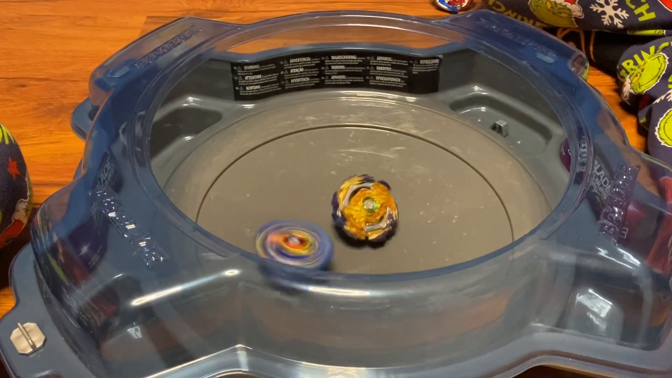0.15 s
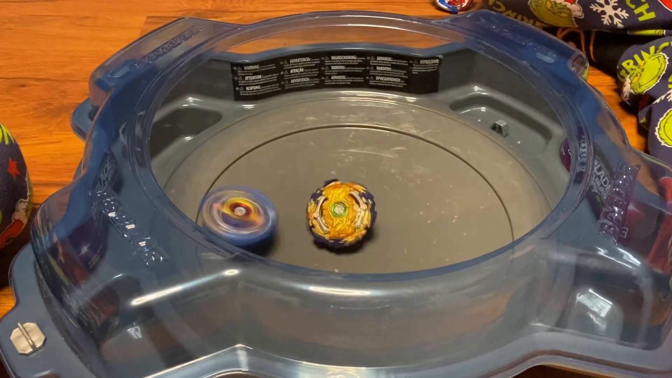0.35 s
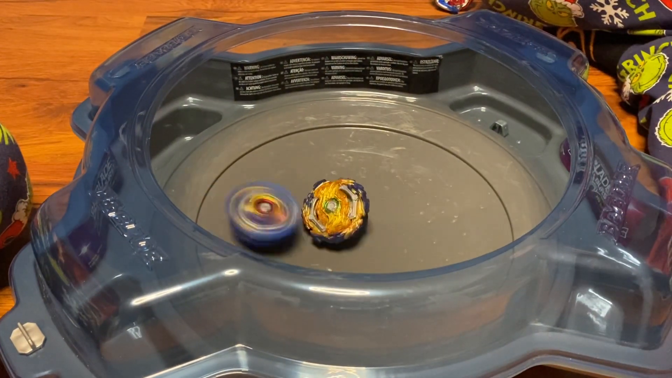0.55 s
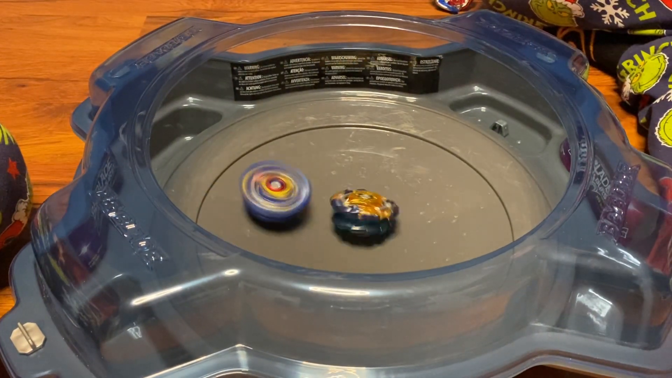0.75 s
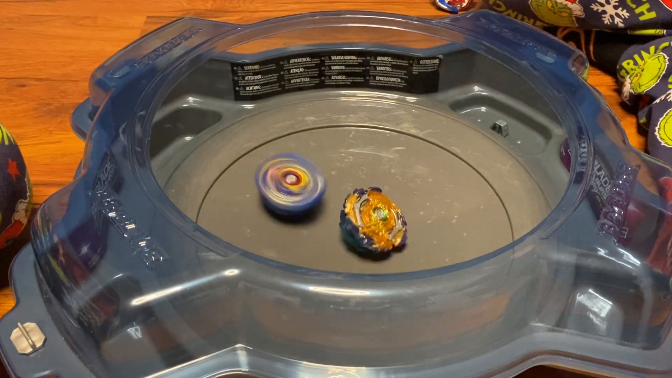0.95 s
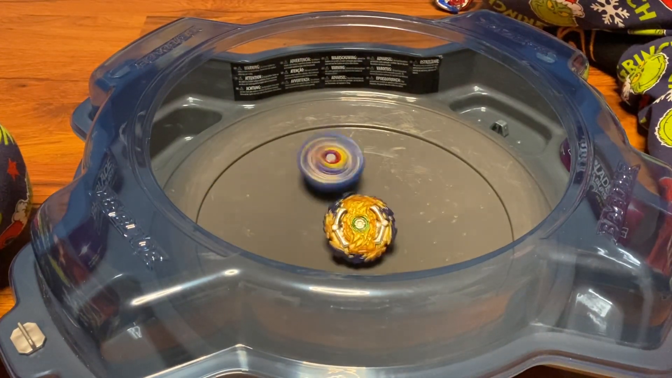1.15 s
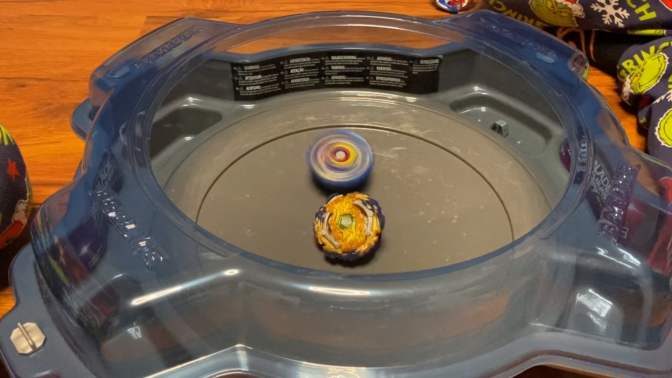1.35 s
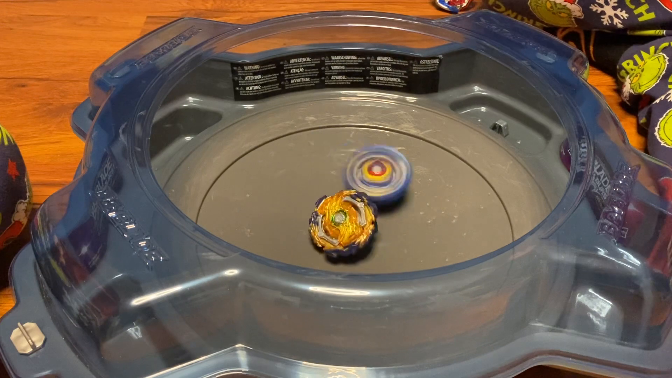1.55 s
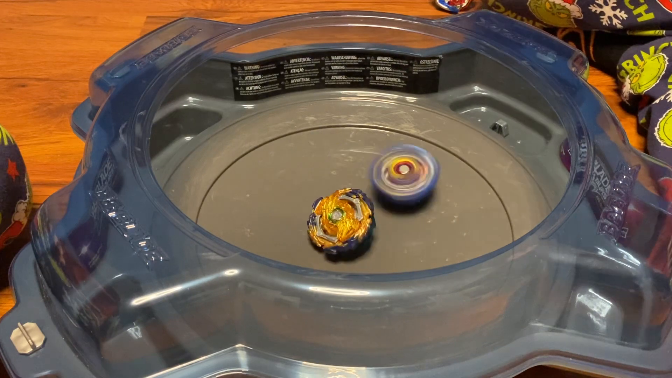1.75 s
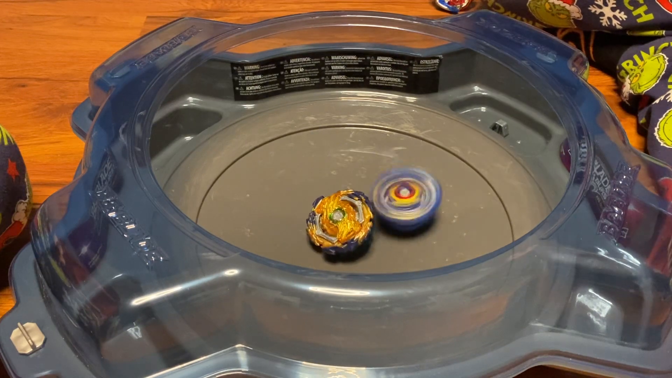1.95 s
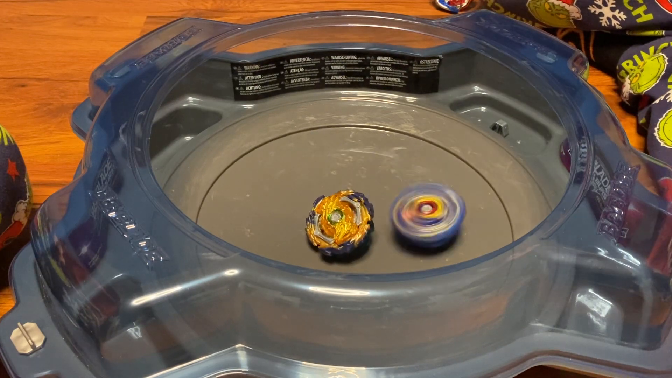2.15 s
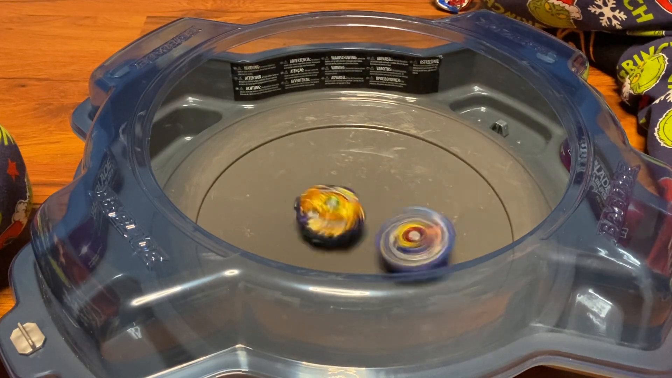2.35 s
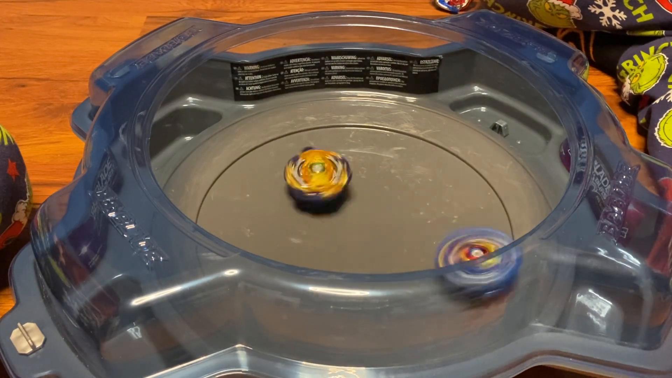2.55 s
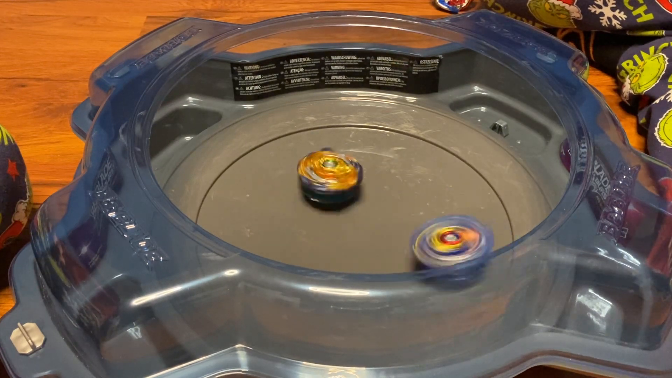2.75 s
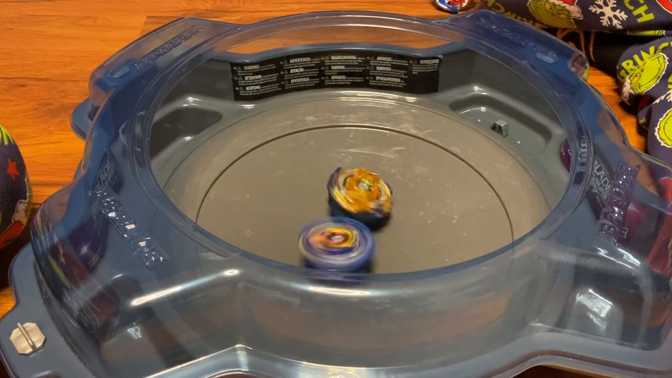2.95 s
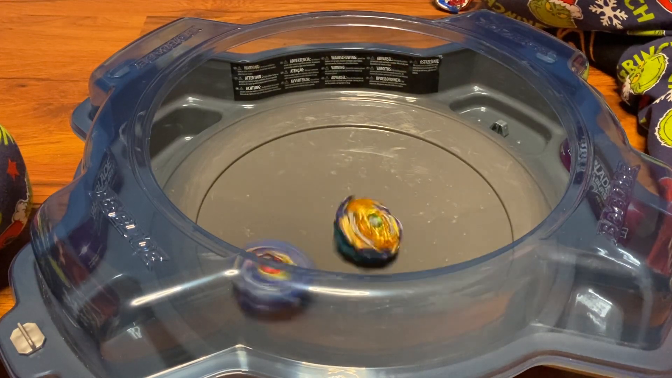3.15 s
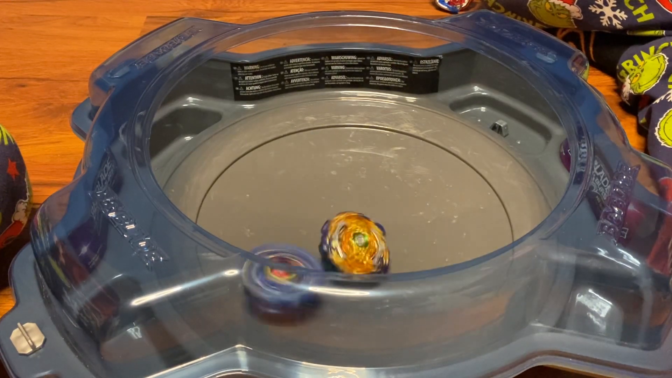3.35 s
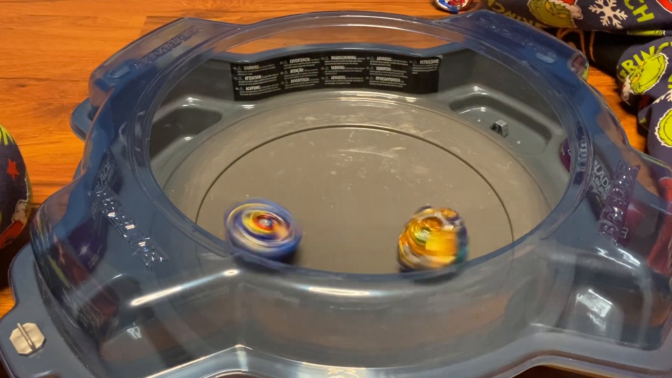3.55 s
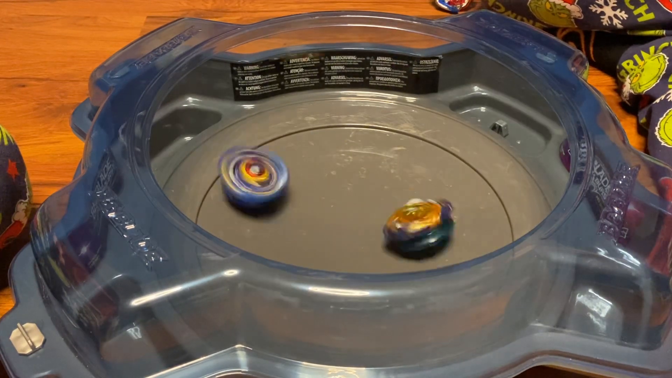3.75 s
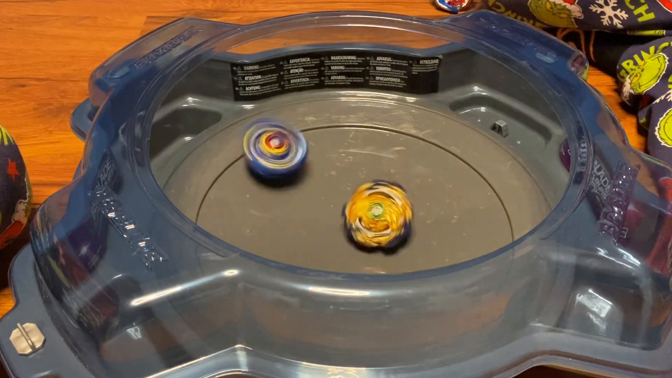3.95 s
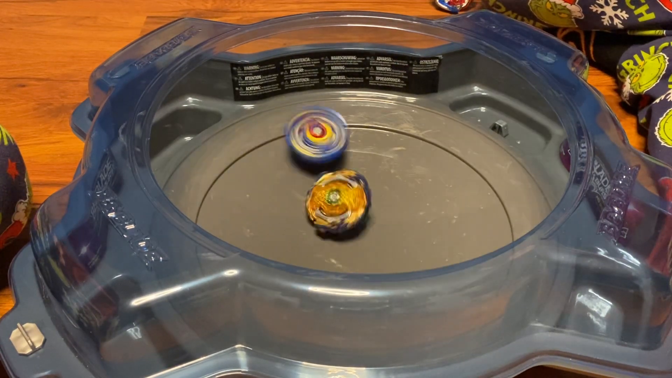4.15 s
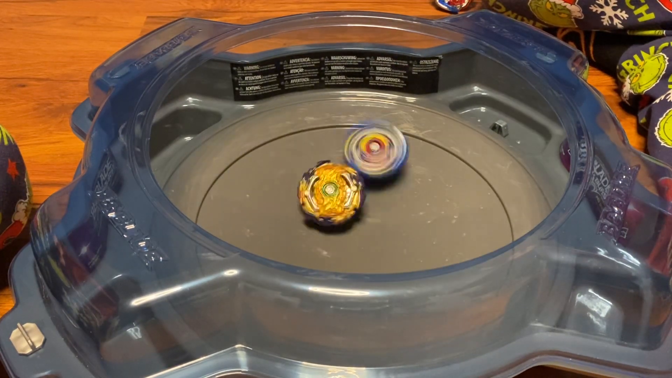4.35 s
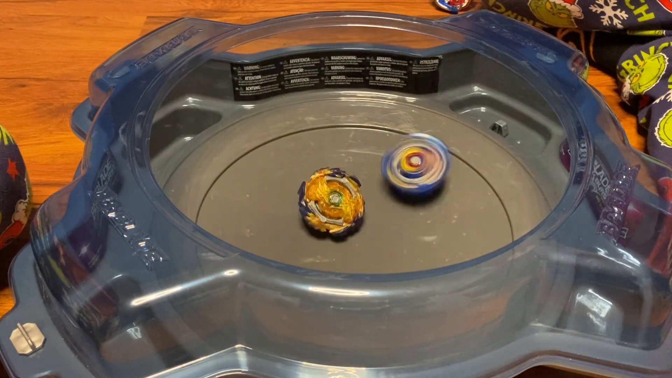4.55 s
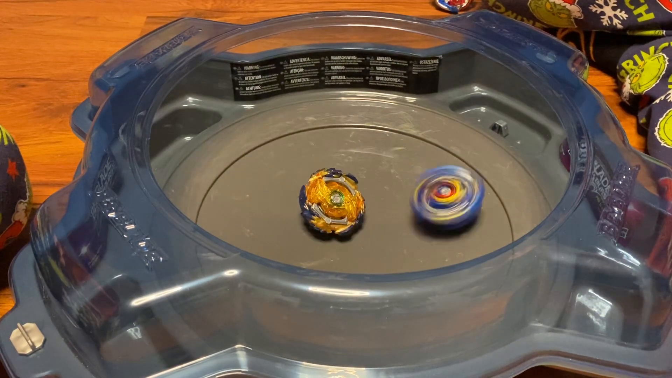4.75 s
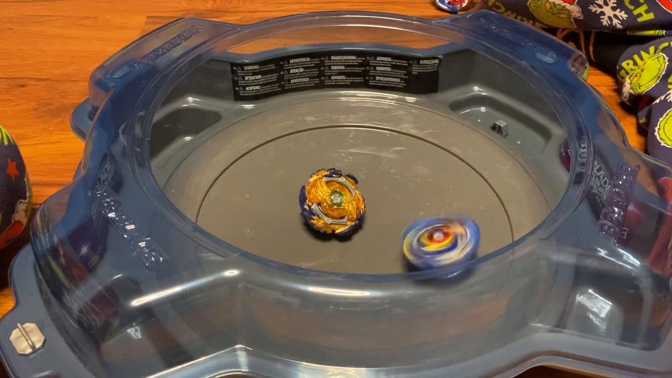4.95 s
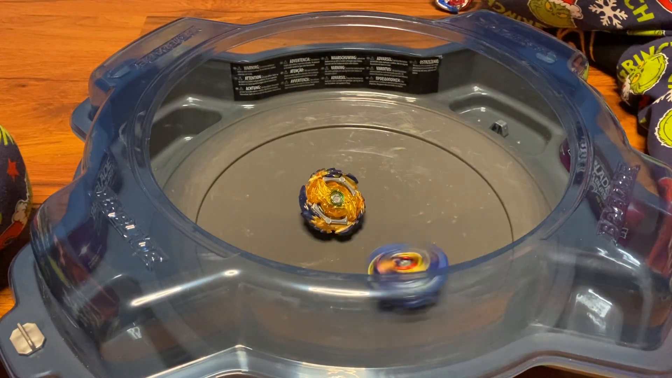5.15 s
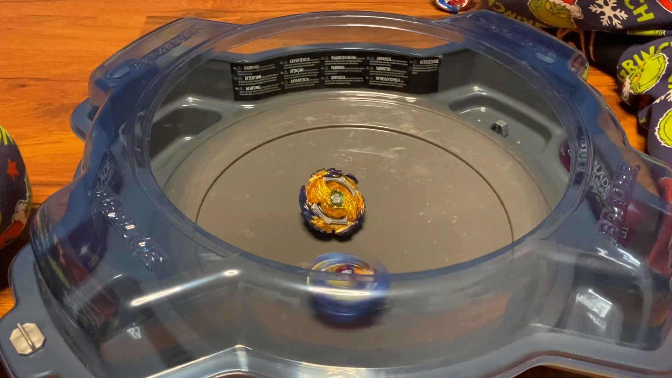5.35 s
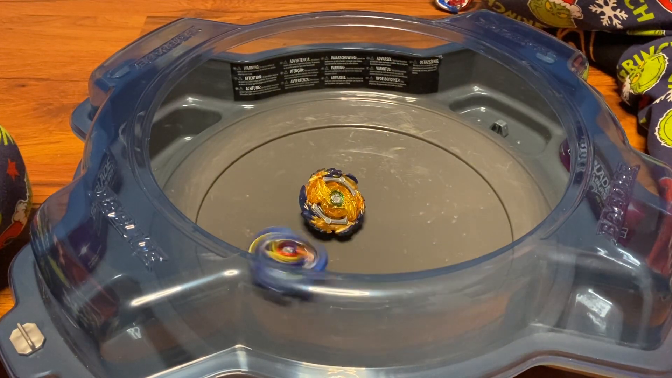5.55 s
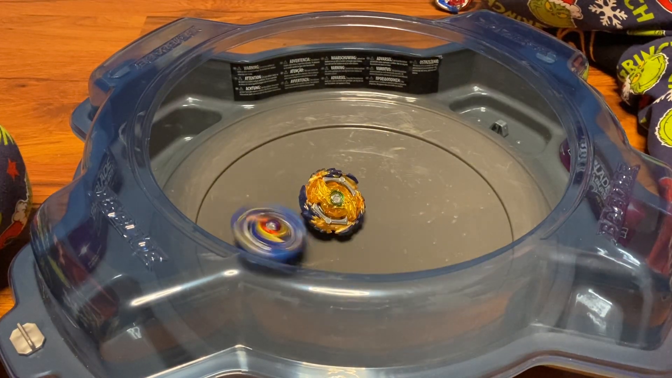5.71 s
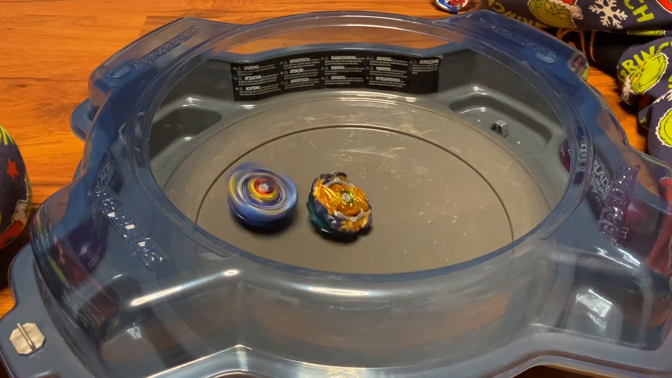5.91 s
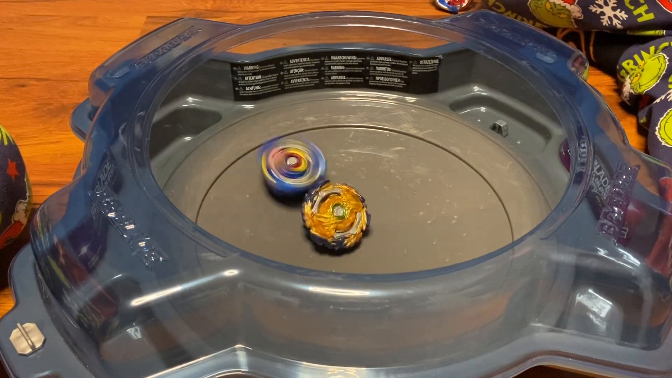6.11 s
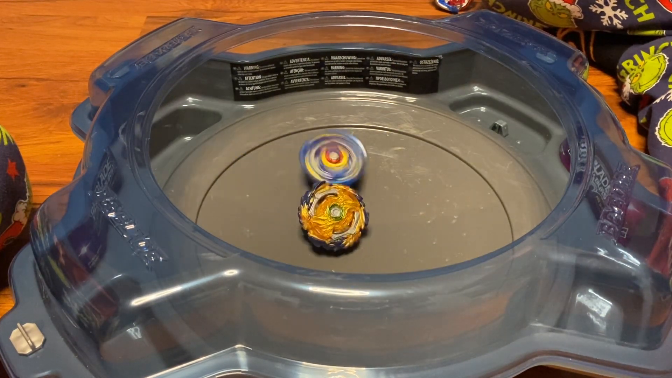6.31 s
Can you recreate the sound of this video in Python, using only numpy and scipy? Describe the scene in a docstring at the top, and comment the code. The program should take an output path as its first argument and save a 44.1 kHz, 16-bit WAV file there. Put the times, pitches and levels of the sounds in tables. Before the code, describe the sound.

Close up in a small room, two spinning tops rumble and scrape in a thin plastic bowl. Sharp clacks crack out between gritty, rhythmic scrapes and tiny metallic chinks. Around three seconds the scraping turns into a dense clatter of rapid knocks with one very hard hit. A few more clacks follow, then the scraping fades, leaving low humming, faint brushing ticks and late dull knocks.

```python
"""Two spinning tops in an arena

Two toy tops with metal rims spin in a thin plastic arena, close to a phone in a small room.
Noise grains shaped by the shell make the rumble and scraping; sine waves make the spinning hum.
Clacks, knocks and scrapes are short noise bursts, most with ringing plastic or metal.
From three seconds on, bouts of chatter rasp between the blows; the scraping has faded by the end."""
import sys
import numpy as np
from scipy import signal
from scipy.fft import rfft, irfft, next_fast_len
from scipy.io import wavfile

SR = 44100
rng = np.random.default_rng(int(sys.argv[2]) if len(sys.argv) > 2 else 0)


def wav_out(sig):
    """Save sig, one row per channel (or a flat mono array), as 16-bit PCM at SR to the path in sys.argv[1]."""
    wavfile.write(sys.argv[1], SR, np.round(np.clip(np.atleast_2d(sig).T, -1, 1) * 32767).astype(np.int16))


N = 285665
TIME = np.arange(N) / SR  # seconds


def undb(db):
    """Decibels to gain."""
    return 10 ** (np.asarray(db) / 20)


def unit(x):
    """Scale to rms 1."""
    return x / np.sqrt(np.mean(x ** 2))


def curves(table):
    """Each column of a timed table, joined by straight lines."""
    s, *columns = np.transpose(table)
    return [np.interp(TIME, s, c) for c in columns]


def add(out, s, x):
    """Mix x into out from time s on."""
    i = max(int(s * SR), 0)
    out[i:i + len(x)] += x[:max(N - i, 0)]


def colour(x, points, peak_hz=1000, peak_db=0, octaves=.25, size=8192):
    """Causal filter through (Hz, dB) points with one optional resonance; white noise keeps its power."""
    pitch = np.log2(np.maximum(np.fft.rfftfreq(size, 1 / SR), 1))
    hz, db = np.transpose(points)
    resonance_db = peak_db / (1 + ((pitch - np.log2(peak_hz)) / octaves) ** 2)
    db = np.interp(pitch, np.log2(hz), db) + resonance_db
    # folding the cepstrum gives minimum phase: nothing sounds before its cause
    cepstrum = irfft(np.log(unit(undb(db))))
    cepstrum[1:size // 2] *= 2
    cepstrum[size // 2 + 1:] = 0
    response = irfft(np.exp(rfft(cepstrum)))
    return signal.fftconvolve(x, response)[:len(x)]


def walk(rate):
    """Random wander with a spread near 1: straight lines between `rate` random points a second."""
    knots = rng.standard_normal(int(N / SR * rate) + 2)
    return np.interp(TIME * rate, np.arange(len(knots)), knots) * np.sqrt(1.5)


def fade(t, t60):
    """A decay of 60 dB in t60 seconds."""
    return np.exp(-np.log(1000) * t / t60)


def ring(modes, t, scatter_db, detune=0.0051):
    """Struck modes; each blow lands elsewhere, weights them anew and detunes them slightly."""
    hz, db, t60 = np.transpose(modes)[:, :, None]
    gain = undb(db + scatter_db * rng.standard_normal(db.shape))
    hz = hz * (1 + detune * rng.standard_normal(hz.shape))
    waves = np.sin(2 * np.pi * (hz * t + rng.random(hz.shape)))
    return (gain * fade(t, t60) * waves).sum(0) / np.sqrt(np.sum(undb(db) ** 2) / 2)


def burst(t, rise, hold, t60):
    """Teeth grind past each other for a moment, then the plastic rings out: noise that rises and dies."""
    noise = rng.standard_normal(len(t))
    return noise * np.minimum(t / rise, 1) * fade(np.maximum(t - hold, 0), t60)


def grit(rate, spread_db):
    """Tiny collisions with the grain of the floor, `rate` a second, a few much harder than the rest."""
    size = undb(spread_db * np.minimum(rng.exponential(size=N), 5))
    hits = rng.random(N) < rate / SR
    return unit(hits * rng.standard_normal(N) * size)


# Quiet of the room. Each row: pitch in Hz, strength in relative dB.
ROOM_TONE = [(25, 2), (100, -1), (300, -11.5), (800, -23.5), (2000, -24.5), (5000, -22.5), (8000, -44),
             (12000, -59.5), (16000, -64)]


def room_air():
    """Faint steady noise, independent on the left and right."""
    sides = [colour(rng.standard_normal(N), ROOM_TONE) for _ in range(2)]
    return undb(-64.5) * np.array(sides)


# The fast top's speed. Each row: time in seconds, turns a second in Hz.
SPIN = [(0, 75.65), (1.6, 69.65), (4.8, 64.38), (6.48, 57.74)]


def fast_top_turn():
    """Turning angle of the fast top in radians, summed up from its speed."""
    return 2 * np.pi * np.cumsum(curves(SPIN)[0]) / SR


# Tips on the floor. Each row: time in seconds, rolling in dB, shell rumble in dB, both before trims.
CONTACT = [(0, -45.5, -40.5), (.15, -55.5, -52), (.55, -56, -58.5), (.75, -51, -47), (1.1, -56, -50.5),
           (2.3, -53.5, -58.5), (2.6, -49.5, -45.5), (2.8, -58, -50), (4.25, -54, -51), (4.7, -69, -57.5),
           (5.1, -69.5, -47), (5.55, -73.5, -63), (6.48, -63, -48.5)]
# A bout of chatter starts this much softer, builds up over this time constant, holds and dies away.
BUILD_DB, BUILD_S, SETTLE_T60_S = 4, 0.036, 0.32
# Rumble after a clack, relative to the thud column of CLACKS, and its decay.
JOLT_DB, JOLT_T60_S = -15.5, 0.77


def bout(t, start, end):
    """Strength of a bout of chatter: it builds up, holds and dies away."""
    build = undb(-BUILD_DB * np.exp(-np.maximum(t - start, 0) / BUILD_S))
    return (t >= start) * build * fade(np.maximum(t - end, 0), SETTLE_T60_S)


def load():
    """How hard the tips drum and shake the shell: steady contact, bouts of chatter and clack jolts."""
    roll, shake = undb(curves(CONTACT))
    # np.hypot adds the layers by power
    for start, end, _, drum_db, rumble_db in CHATTER:
        strength = bout(TIME, start, end)
        roll = np.hypot(roll, undb(drum_db) * strength)
        shake = np.hypot(shake, undb(rumble_db) * strength)
    for s, _, _, thud_db, *_ in CLACKS:
        jolt = (TIME >= s) * fade(np.maximum(TIME - s, 0), JOLT_T60_S)
        shake = np.hypot(shake, undb(thud_db + JOLT_DB) * jolt)
    return roll, shake


# Drumming of the tips on the shell. Each row: pitch in Hz, strength in relative dB.
ROLL_TONE = [(70, -15), (130, 8.5), (230, -0.5), (290, 6.5), (350, -2.5), (420, 1.5), (510, -12.5),
             (595, -3), (780, -12.5), (1000, -10.5), (1200, -17), (1500, -14), (3000, -19.5), (7000, -38)]
# Deep shaking of the shell. Each row: pitch in Hz, strength in relative dB.
RUMBLE_TONE = [(20, -32), (40, -17.5), (62, 6), (85, -5), (108, -0.5), (160, -14.5), (300, -47.5)]


def rolling(roll, shake, fast_turn):
    """The tips drum on the thin shell, pressing harder once a turn, over a deep rumble."""
    press = (1 + 0.21 * np.cos(fast_turn)) * undb(1.1 * walk(30))
    drumming = colour(grit(1200, 2.5) * press, ROLL_TONE)
    rumble = unit(colour(rng.standard_normal(N), RUMBLE_TONE))
    return roll * undb(1.0) * drumming + shake * undb(-3.0) * rumble


# Hum of the unbalanced top. Each row: multiple of the turning rate, strength in relative dB.
HUM = [(1, 0.5), (2, -23), (3, -21), (4, -21), (5, -26), (6, -35), (7, -35.5)]
# The fast top's hum through the floor. Each row: time in seconds, level in dB before a trim.
HUM_LEVEL = [(0, -67), (.9, -57), (1.7, -59.5), (3.3, -52), (4.8, -66), (5.5, -55), (5.85, -45.5),
             (6.02, -59.5), (6.48, -50)]


def hum(fast_turn):
    """The fast top's imbalance shakes the floor at its turning rate and multiples."""
    level = undb(curves(HUM_LEVEL)[0] + 3.0)
    # the strength of each multiple wanders on its own
    return level * sum(undb(db + 3.0 * walk(10)) * np.sin(k * fast_turn) for k, db in HUM)


# The slow top's rim dragging on the floor. Each row: time in seconds, dry friction in dB before trims.
DRAG = [(0, -52.5), (.3, -63), (.45, -55.5), (.8, -52.5), (1.4, -50.5), (1.55, -59), (1.7, -53), (2.3, -50),
        (2.65, -53.5), (3, -74.5), (3.3, -53), (3.5, -43), (3.8, -63), (4.1, -82.5), (4.35, -69),
        (5.5, -84), (6.48, -93)]
# Body of the friction. Each row: pitch in Hz, strength in relative dB.
FRICTION_TONE = [(600, -15.5), (880, 4.5), (1020, 8), (1250, 12), (1420, -3.5), (1900, -2.5), (2600, 0),
                 (3500, 1.5), (4400, 3), (6000, -1), (9000, -4), (15500, -27.5)]
# Hiss of friction and scrapes. Each row: pitch in Hz, strength in relative dB.
HISS_TONE = [(500, -30), (1500, -16), (3400, 6.5), (4400, -4.5), (6800, 4), (9000, 0), (12000, 0),
             (15500, -12)]
FLOOR_GRAIN_DB = 3  # spread of the sizes of the grains under the body of the friction


def friction():
    """Dense, uneven scraping of the slow top; the harder it presses, the brighter it hisses."""
    pressure = undb(curves(DRAG)[0] - 4.5 + 3.5 * walk(140))
    brightness = np.minimum(pressure / undb(-53.5), 1) ** 0.6
    body, hiss = np.zeros(N), np.zeros(N)
    # the touching spot keeps changing, so the floor's and the rim's resonances flare up in turn
    for hz in (1060, 1170, 1280):
        grains = grit(5500, FLOOR_GRAIN_DB) * pressure * undb(4 * walk(18))
        body += colour(grains, FRICTION_TONE, hz, peak_db=6.5, octaves=.06)
    for hz in (2640, 3700, 5100, 7110, 11600, 15150):
        grains = grit(4900, 2.7) * pressure * brightness * undb(6.6 * walk(82))
        hiss += colour(grains, HISS_TONE, hz, peak_db=13.5, octaves=0.13)
    return undb(-4) * body + undb(-12) * hiss


# Bright crack of a blow. Each row: pitch in Hz, strength in relative dB.
CRACK_TONE = [(2000, -30), (5000, -3.5), (7000, 1.5), (8200, -1), (10500, 4), (14000, -2), (15500, -9.5)]
# Modes of the plastic shell. Each row: pitch in Hz, strength in relative dB, 60 dB decay in seconds.
SHELL = [(67.5, -26, .25), (115, -4, 0.15), (143, -18, 0.19), (171, -10, 0.39), (218.3, -7.5, 0.38),
         (284.6, 2, 0.16), (374, -7.5, 0.071), (374, -2, 0.14), (446, -7.5, 0.24), (517, -17, 0.13),
         (593.5, 4.5, 0.11), (735, -6, 0.14), (966, -8.5, 0.059), (1173, -7, 0.22)]


def blow(knock, crack_db, thud_db, thud_hz, rise, hold, t60, swell):
    """One blow: a hollow knock, a bright crack, and the shell's thud, which swells a little later."""
    t = np.arange(len(knock)) / SR
    crack = colour(burst(t, rise, hold, t60), CRACK_TONE)
    flexing = burst(t, 0.00029, 0.0055, 0.064) + undb(-16.0) * burst(t, 0.0068, 0.01, 0.17)
    flex_tone = [(30, -34), (90, -4), (200, -7.0), (420, -6.5),
                 (700, -13.5), (1150, -7.0), (1600, -28.5), (4000, -51.0)]  # (Hz, relative dB)
    flex = colour(flexing, flex_tone, thud_hz, peak_db=9.5, octaves=0.28)
    thud = (undb(-3) * ring(SHELL, t, scatter_db=1.5) + flex) * (1 - np.exp(-t / swell))
    return knock + undb(crack_db) * crack + undb(thud_db) * thud


# Hollow knock of a rim on plastic. Each row: pitch in Hz, strength in relative dB.
KNOCK_TONE = [(60, -27.5), (300, -20.5), (650, -4.5), (1150, 2.5), (1450, -1), (2000, 1.5), (3100, -2.5),
              (4400, -10), (6000, -16), (9000, -27.5)]
# One top's metal rim. Each row: pitch in Hz, strength in relative dB, free 60 dB decay in seconds.
LOWER_RIM = [(3300, -13.5, .4), (6490, 0.5, 0.29), (10000, -4, .1), (11100, -14, .2), (14400, -4.5, .09)]
# The other top's rim. Each row: pitch in Hz, strength in relative dB, free 60 dB decay in seconds.
HIGHER_RIM = [(3630, -13.5, .2), (6976, -0.5, 0.2), (7720, -12.5, .2), (10900, -11.5, .22),
              (14935, -2.5, .16)]
TOUCHING_T60_S = 0.13  # a rim that lies against the floor is damped by this extra decay
# The wall rings on at the pitch of a knock: level relative to the knock column of KNOCKS, and decay.
WALL_RING_DB, WALL_RING_T60_S = -20.5, .26


def rim_tap(db, crack_db, thud_db, hz):
    """A short, sharp tap of a rim on the floor; the arena's wall and the damped rims ring after it."""
    t = np.arange(SR // 3) / SR
    tap = burst(t, 0.000095, 0.0003, 0.024) + undb(-12.5) * burst(t, .002, 0.009, 0.072)
    knock = undb(db + 2.5) * colour(tap, KNOCK_TONE, hz, peak_db=11.0, octaves=0.12)
    wall = undb(db + WALL_RING_DB) * ring([(hz, 0, WALL_RING_T60_S)], t, scatter_db=1.5)
    rims = ring(LOWER_RIM[:3] + HIGHER_RIM[:2], t, scatter_db=4.5) * fade(t, TOUCHING_T60_S)
    hit = blow(knock + wall, crack_db - 0.5, thud_db + 3.0, thud_hz=416,
               rise=.0005, hold=0.001, t60=0.044, swell=0.0024)
    return hit + undb(crack_db - 4) * rims


# A rim knocks on the arena. Each row: start in seconds, then knock, bright crack and arena thud
# in dB before trims, pitch of the knock in Hz.
KNOCKS = [(0.011, -50, -54, -45.5, 704), (0.0805, -44.5, -82, -49.5, 2620), (0.117, -49, -72, -56, 2280),
          (0.148, -51.5, -69, -56.5, 2530), (.168, -51, -70, -61.5, 2100), (0.295, -41.5, -69.5, -71, 2200),
          (0.324, -45.5, -76, -70, 2410), (1.474, -37.5, -64.5, -41.5, 1310),
          (1.492, -41.5, -51, -63, 1950), (2.4167, -35.5, -49.5, -41.5, 2750),
          (3.022, -41, -56.5, -45, 1240), (3.0485, -35.5, -54.5, -40.5, 2800),
          (3.0364, -41, -56.5, -50.5, 2900), (3.063, -34.5, -50.5, -45.5, 2750),
          (3.071, -33.5, -48.5, -40, 1880), (3.0905, -35.5, -45.5, -40.5, 1970),
          (3.1159, -30.5, -54, -42, 2580), (3.142, -33, -61.5, -45, 2500), (3.1599, -30, -49.5, -44, 2290),
          (3.1685, -36.5, -55, -47.5, 2200), (3.1914, -31.5, -57, -47, 2550),
          (3.2201, -38, -58, -42.5, 1210), (3.251, -33.5, -53, -47, 2640),
          (3.2745, -29, -45.5, -46.5, 2000), (3.287, -37, -48, -40.5, 2300),
          (3.3123, -44, -52.5, -40.5, 1240), (3.357, -42, -52, -51.5, 2300), (3.448, -36.5, -39, -37, 1040),
          (3.4564, -26, -39, -34.5, 2740), (3.4715, -25.5, -39.5, -33.5, 2400),
          (3.487, -30.5, -50, -34, 2470), (3.5347, -30.5, -55, -40, 1120), (3.551, -31.5, -48, -34.5, 2410),
          (3.567, -33, -38.5, -35.5, 2710), (3.603, -37.5, -47, -40, 1190),
          (3.6118, -29.5, -47, -37.5, 2750), (3.621, -37, -48, -39, 2490), (3.6446, -32, -49, -38.5, 2420),
          (3.671, -30, -53, -36, 2380), (3.7285, -40, -74, -52, 1150), (3.766, -37, -56, -38, 2500),
          (3.7822, -39, -62, -49.5, 2070), (3.8933, -41, -55, -49.5, 1220),
          (3.9201, -36.5, -51, -42.5, 2820), (3.9409, -36, -58, -42, 2820),
          (3.96, -33.5, -45.5, -40.5, 1220), (3.986, -42, -46.5, -50, 1310),
          (4.012, -36.5, -53.5, -49.5, 2930), (4.0189, -30, -50, -41.5, 2400),
          (4.049, -33, -58, -41.5, 2700), (4.1108, -41, -55.5, -44, 2860), (4.141, -43, -58.5, -52, 2980),
          (4.1472, -37, -47.5, -42, 2120), (4.1746, -39, -47, -46, 1620), (4.192, -41, -56.5, -47, 2800),
          (4.2496, -40.5, -67, -53.5, 1140), (4.46, -40, -59, -45.5, 2333), (5.821, -40, -55, -49, 1060),
          (5.9389, -41, -66, -48, 2760), (5.945, -44, -70, -45.5, 1080), (6.039, -47, -77, -51, 2400),
          (6.042, -42, -80, -47, 1326), (6.117, -48.5, -73, -68, 3050), (6.437, -48.5, -67, -51.5, 1235)]


def knocks():
    """Single knocks of a rim on the arena."""
    out = np.zeros(N)
    for s, *knock in KNOCKS:
        add(out, s, rim_tap(*knock))
    return out


# The wobbling top digs its rim in. Each row: start in seconds, hiss in dB, grinding in dB,
# both as gains on the rubbing noise.
SCRAPES = [(.229, -52, -55), (.263, -63, -49), (.397, -48, -52.5), (.429, -50.5, -57), (.466, -50, -51.5),
           (.538, -55, -57), (.58, -53.5, -54.5), (.779, -50, -44.5), (.821, -44.5, -50),
           (.902, -46.5, -50), (.942, -50, -62), (.975, -54, -50), (1.018, -45.5, -56), (1.062, -47.5, -49),
           (1.107, -49.5, -49.5), (1.146, -54, -47.5), (1.18, -45.5, -51), (1.222, -43, -47.5),
           (1.24, -44.5, -47.5), (1.262, -45.5, -49), (1.304, -40.5, -47), (1.34, -50, -55.5),
           (1.376, -48, -47.5), (1.418, -48, -48.5), (1.591, -48.5, -52), (1.637, -41.5, -48),
           (1.678, -39.5, -50.5), (1.723, -44.5, -48), (1.769, -44, -43.5), (1.783, -46.5, -47.5),
           (1.807, -44.5, -49.5), (1.887, -51, -54.5), (2.025, -45.5, -43.5), (2.071, -54.5, -50.5),
           (2.091, -49.5, -53.5), (2.116, -45.5, -45.5), (2.161, -45, -45.5), (2.206, -40.5, -42.5),
           (2.243, -41.5, -46), (2.287, -47, -50.5), (2.308, -49, -52), (2.557, -57, -50),
           (2.611, -57, -54), (2.631, -53, -58), (2.661, -45.5, -47), (2.779, -60.5, -57),
           (2.794, -56, -56), (2.856, -71, -56), (2.881, -53, -61), (2.943, -75, -56.5)]
# Grinding of a scrape. Each row: pitch in Hz, strength in relative dB.
GRIND_TONE = [(150, -14), (600, -11), (900, -3), (1200, 6), (1500, -6.5), (2500, -2), (3600, 1.5),
              (5000, -11), (9000, -28)]
SCRAPE_RISE_S, SCRAPE_HOLD_S, SCRAPE_T60_S = 0.0013, 0.0071, .03
SCRAPE_THUMP_DB = 3  # the floor gives under a scrape, relative to its grinding
SCRAPE_TICK_DB, SCRAPE_TICK_S = 3, .005  # each tooth that catches ticks, about this far apart


def scrapes():
    """Each dig of the rim ticks, hisses, grinds and nudges the floor, at a new spot and pitch."""
    out, t = np.zeros(N), np.arange(SR // 8) / SR
    spots = rng.standard_normal((len(SCRAPES), 2))
    for (s, hiss_db, grind_db), spot in zip(SCRAPES, spots):
        teeth = np.cumsum(SCRAPE_TICK_S * rng.uniform(.5, 1.5, 3)) - SCRAPE_TICK_S
        ticks = sum((t >= at) * burst(np.maximum(t - at, 0), .0001, 0.00029, 0.0057) for at in teeth)
        rub = undb(-3.5) * burst(t, SCRAPE_RISE_S, SCRAPE_HOLD_S, SCRAPE_T60_S)
        rub = rub + undb(SCRAPE_TICK_DB) * ticks
        hiss = colour(rub, HISS_TONE, 5800 * 2 ** (.3 * spot[0]), peak_db=6, octaves=.2)
        grind = colour(rub, GRIND_TONE, 1700 * 2 ** (0.33 * spot[1]), peak_db=6, octaves=.16)
        thump = undb(SCRAPE_THUMP_DB) * colour(rub, ROLL_TONE)
        add(out, s, undb(hiss_db) * hiss + undb(grind_db) * (grind + thump))
    return out


# The edge of a rim nicks the floor with a thin chink. Each row: start in seconds, level in dB.
CHINKS = [(0.449, -43), (.483, -45), (.759, -43.5), (.798, -44), (.904, -46), (1.161, -45), (1.239, -42),
          (1.394, -49), (1.44, -44), (1.655, -40.5), (1.679, -42), (1.784, -46), (1.828, -48.5),
          (1.904, -47.5), (2.045, -44), (2.088, -44), (2.215, -46.5), (2.259, -47)]
# Modes of the edge. Each row: pitch in Hz, strength in relative dB, 60 dB decay in seconds.
CHINK_MODES = [(7300, -13, .03), (11300, -1.5, .04), (12000, 1, .045), (15000, -4.5, 0.033)]


def chinks():
    """A tiny click, and the rim's edge rings for a moment."""
    out, t = np.zeros(N), np.arange(SR // 10) / SR
    for s, db in CHINKS:
        click = undb(-0.5) * colour(burst(t, .0004, 0.0012, .018), CRACK_TONE)
        edge = ring(CHINK_MODES, t, scatter_db=0.0, detune=.012) * np.minimum(t / .0015, 1)
        add(out, s, undb(db) * (click + edge))
    return out


# Top against top. Each row: start in seconds, then clack, bright crack and arena thud in dB before
# trims, pitch of the clack in Hz, pitch of the thud in Hz, then buzz, lower rim, higher rim and
# rattle in dB.
CLACKS = [(0.61, -20, -14.5, -26, 3340, 247, -49, -59.5, -31.5, -36.5),
          (1.4652, -38.5, -29.5, -45, 3600, 390, -57, -65, -59, -48.5),
          (1.9222, -20.5, -20, -28.5, 1830, 330, -32.5, -41.5, -60.5, -45),
          (2.3395, -33.5, -19, -38, 2920, 354, -53, -60, -59.5, -48.5),
          (2.3445, -18, -14.5, -30, 3950, 380, -44, -44, -57, -31.5),
          (2.3486, -24, -22.5, -22.5, 2604, 562, -62, -42.5, -52.5, -40.5),
          (3.3788, -17.5, -12, -22.5, 2570, 360, -34.5, -37, -45.5, -33.5),
          (4.0754, -30.5, -47, -38, 2900, 380, -63, -51.5, -66, -53),
          (4.362, -23, -17.5, -25, 1790, 590, -33, -56.5, -36, -42),
          (4.3632, -25, -20.5, -41, 3710, 442, -47.5, -57, -51.5, -50.5),
          (5.796, -27, -29.5, -30.5, 1152, 162, -47, -70, -70, -41),
          (6.028, -68, -78, -42, 2710, 150, -80, -90, -90, -77),
          (6.119, -58, -80, -47.5, 3000, 133, -85, -90, -90, -75)]
# Plastic bodies striking. Each row: pitch in Hz, strength in relative dB.
CLACK_TONE = [(60, -39), (300, -38.5), (700, -23), (1100, -7.5), (1450, -3.5), (2000, -2.5), (3500, 0),
              (4400, -7), (6000, -16.5), (9000, -19)]
# Buzz after a clack. Each row: pitch in Hz, strength in relative dB.
AFTER_RING = [(300, -39.5), (1000, -16.5), (1500, -9), (1830, 2.5), (2120, 0), (2600, -8.5), (3500, -12.5),
              (4300, -23.5), (8000, -41.5)]
# Rattle after a clack. Each row: pitch in Hz, strength in relative dB.
RATTLE_TONE = [(300, -12.5), (1000, -2), (4500, -1.5), (7500, 1.5), (9000, -5), (12000, -11),
               (15500, -15.5)]
BODY_SHARE = 0.36  # a clack carries little body below this share of its pitch
BUZZ_T60_S, BUZZ_PER_S, BUZZ_ROUGH_DB = 0.29, 2500, 2.5  # loose layers buzz against each other
RATTLE_T60_S, RATTLE_PER_S = .3, 2900  # loose parts rattle after a clack


def clacks():
    """Rims collide; the plastic body and each metal rim ring on briefly, and loose parts rattle."""
    out, t = np.zeros(N), np.arange(SR // 2) / SR
    for s, db, crack_db, thud_db, hz, thud_hz, buzz_db, lower_db, higher_db, rattle_db in CLACKS:
        knock = colour(burst(t, 0.0012, 0.0043, 0.024), CLACK_TONE, hz, peak_db=6, octaves=0.18)
        thin = signal.butter(2, BODY_SHARE * hz, "high", fs=SR, output="sos")
        knock = signal.sosfilt(thin, undb(db + 1.0) * knock)
        hit = blow(knock, crack_db + 2.0, thud_db - .7, thud_hz,
                   rise=0.0021, hold=0.002, t60=0.032, swell=0.00037)
        buzzing = (grit(BUZZ_PER_S, 1.1) * undb(BUZZ_ROUGH_DB * walk(200)))[:len(t)]
        buzz = undb(buzz_db) * colour(buzzing * fade(t, BUZZ_T60_S), AFTER_RING)
        lower = undb(lower_db) * ring(LOWER_RIM, t, scatter_db=1.0, detune=0.00077)
        higher = undb(higher_db) * ring(HIGHER_RIM, t, scatter_db=1.0, detune=0.00077)
        rattling = grit(RATTLE_PER_S, 2.3)[:len(t)] * fade(t, RATTLE_T60_S)
        rattle = undb(rattle_db) * colour(rattling, RATTLE_TONE)
        add(out, s, hit + buzz + lower + higher + rattle)
    return out


# Bouts in which the tilted top rasps along the floor. Each row: start in seconds, end in seconds,
# then rasp, drumming and shell rumble in dB before trims.
CHATTER = [(3.033, 3.284, -51, -52, -52), (3.44, 3.487, -48, -32.5, -29), (3.538, 3.657, -46, -39, -35),
           (3.759, 3.774, -68.5, -62, -38), (3.893, 4.174, -47, -45.5, -45)]


def chatter():
    """The tilted rim rasps along the floor, ringing the wall at changing pitches."""
    rasp = sum(undb(rasp_db) * bout(TIME, start, end) for start, end, rasp_db, _, _ in CHATTER)
    rasp = rasp * undb(5.7 * walk(160))
    out = np.zeros(N)
    for hz in (1700, 2700, 3700):
        grains = grit(2200, 1.6) * rasp * undb(2.3 * walk(50))
        out += colour(grains, KNOCK_TONE, hz, peak_db=8, octaves=0.095)
    return undb(-5.5) * out


# Nearly upright, the slow top only brushes the floor once a wobble. Each row: first touch in seconds,
# last touch in seconds, count of touches, middle level in dB.
BRUSHING = [(5.148, 5.29, 4, -60), (5.333, 5.482, 4, -67.5), (5.525, 5.763, 6, -67.5),
            (6.241, 6.34, 3, -64)]
# Soft touch of the rim. Each row: pitch in Hz, strength in relative dB.
BRUSH_TONE = [(200, -8.5), (700, 6.5), (3000, -3), (5000, 1.5), (7000, -11), (15500, -36)]


def brushes():
    """Soft, regular ticks of the upright top's rim on the floor."""
    out, t = np.zeros(N), np.arange(SR // 10) / SR
    for start, end, count, db in BRUSHING:
        for s in np.linspace(start, end, int(round(count))):
            level = undb(db + 3.5 * rng.standard_normal())
            add(out, s, level * burst(t, 0.003, 0.00342, 0.032))
    return colour(out, BRUSH_TONE)


def arena(x, side_db, t60):
    """Sound leaves the wide shell from many places, so left and right hear it a little differently."""
    t = np.arange(SR // 10) / SR
    paths = rng.standard_normal(len(t)) * fade(t, t60)
    spread = signal.fftconvolve(x, paths / np.linalg.norm(paths))[:N]
    spread = colour(spread, [(50, 7.5), (200, -1.5), (600, 6.5), (1100, 10.0),
                             (2000, 3.0), (5500, 8.5), (7500, -13.5), (16000, -7.0)])
    return undb(side_db) * spread * np.array([[1], [-1]])


def room(x, wet_db, t60, treble_t60, shared):
    """The room's tail is decaying noise; the close ports hear much of it alike."""
    t = np.arange(SR * 3 // 4) / SR
    noise = rng.standard_normal((2, len(t)))
    low = signal.sosfilt(signal.butter(2, 6000, fs=SR, output="sos"), noise)
    tails = low * fade(t, t60) + (noise - low) * fade(t, treble_t60)
    tails *= np.minimum(t / 0.0068, 1)
    tails /= np.sqrt(np.sum(tails ** 2, axis=1)[:, None])
    common, side = (signal.fftconvolve(x, tail)[:N] for tail in tails)
    side = colour(side, [(100, -5.5), (700, 7.0), (5500, 3.5), (7500, -10.0), (16000, -9.5)])
    return x + undb(wet_db) * (common + (1 - shared) * side * np.array([[1], [-1]]))


def scene():
    """Both tops in the arena, over the quiet of the room."""
    fast_turn = fast_top_turn()
    tops = rolling(*load(), fast_turn) + friction()
    tops += knocks() + scrapes() + chinks() + clacks() + chatter() + brushes()
    width = arena(tops, side_db=-15, t60=.03)
    heard = room(tops, wet_db=-12.0, t60=0.45, treble_t60=0.28, shared=0.7) + width
    return heard + hum(fast_turn) + room_air()


# The two microphone ports. Each row: pitch in Hz, phase by which the left leads in radians,
# left minus right in dB.
PORTS = [(100, .1, 2.2), (600, 0, .8), (1800, .2, 3), (3300, .6, 1.8), (5200, .4, 3.5), (7300, 0, 0),
         (8000, -1, 0), (9000, -3.1, 0), (10200, -5, 0), (11400, -6.2, 0), (12300, -7.6, 0),
         (13100, -9.4, 0), (14200, -10.8, 0), (15400, -12.5, 0)]
TOP_HZ = 16000  # upper limit of the phone


def record(dry):
    """The phone's two ports differ in level and in phase; deep bass and the top are cut."""
    size = next_fast_len(N + SR)
    hz, lead, tilt_db = np.transpose(PORTS)
    f = np.fft.rfftfreq(size, 1 / SR)
    # each port takes half of the difference
    half = undb(np.interp(f, hz, tilt_db) / 2) * np.exp(.5j * np.interp(f, hz, lead))
    heard = irfft(rfft(dry, size) * np.array([half, 1 / half]), size)[:, :N]
    heard = signal.sosfilt(signal.butter(2, 42, "high", fs=SR, output="sos"), heard)
    return signal.sosfilt(signal.ellip(8, .2, 85, TOP_HZ, fs=SR, output="sos"), heard)


dry = scene()
out = record(dry)
wav_out(out)
```